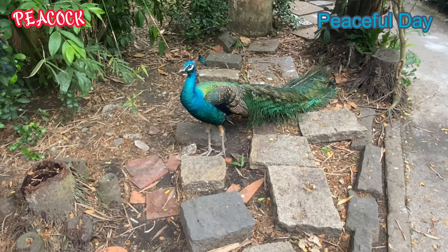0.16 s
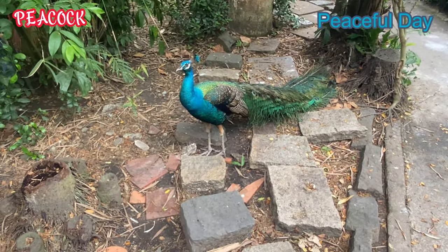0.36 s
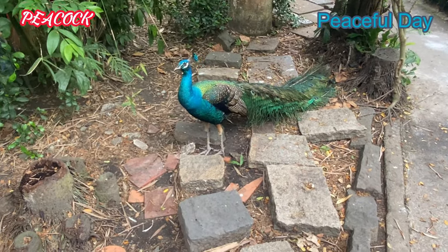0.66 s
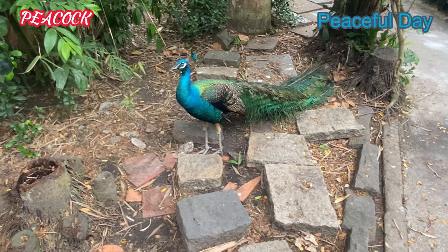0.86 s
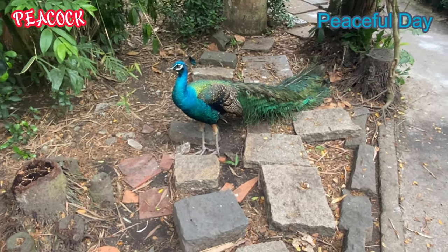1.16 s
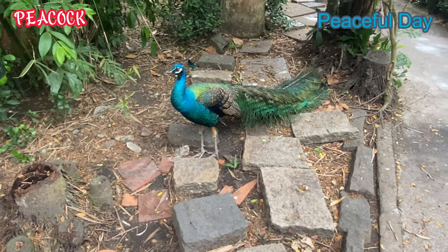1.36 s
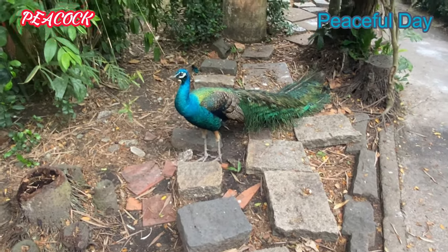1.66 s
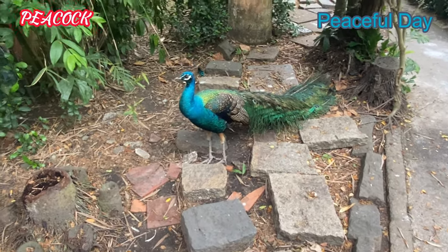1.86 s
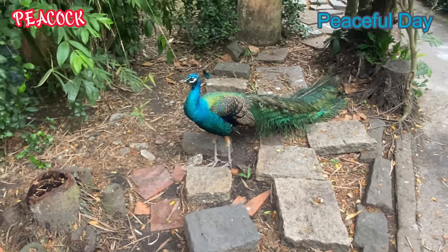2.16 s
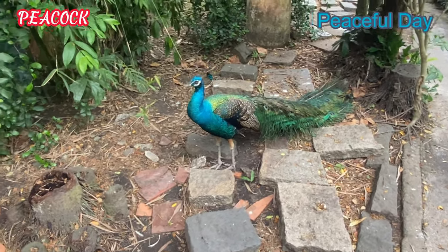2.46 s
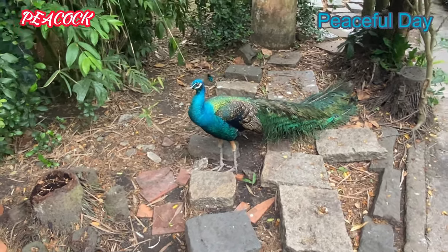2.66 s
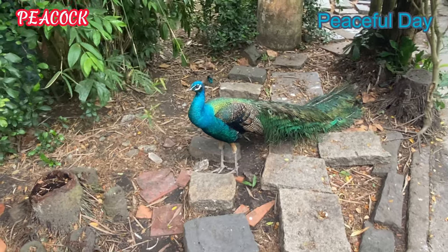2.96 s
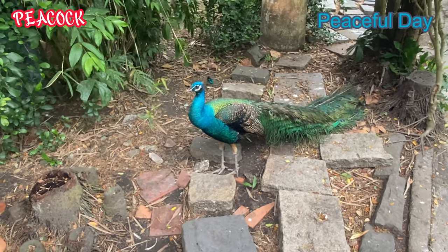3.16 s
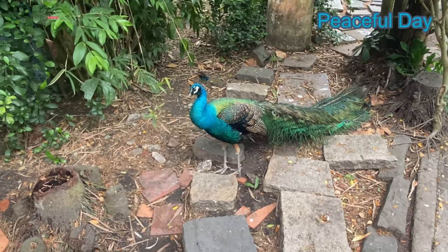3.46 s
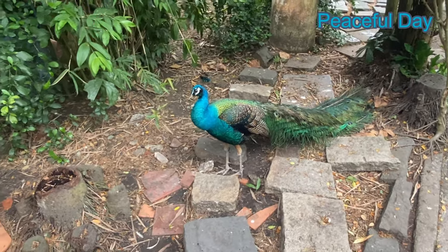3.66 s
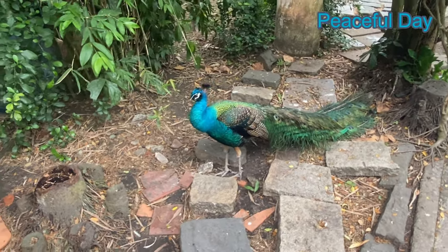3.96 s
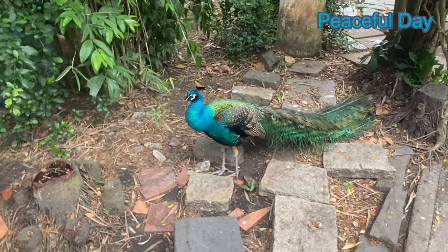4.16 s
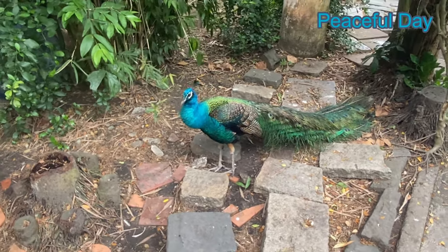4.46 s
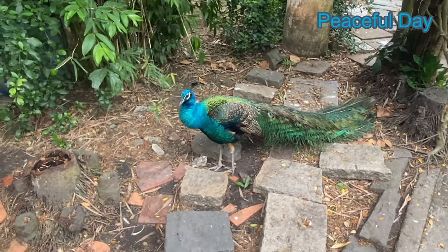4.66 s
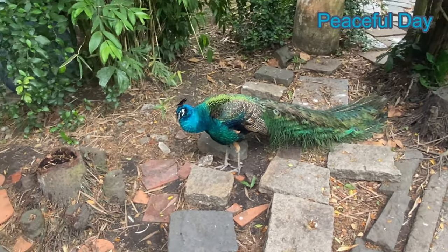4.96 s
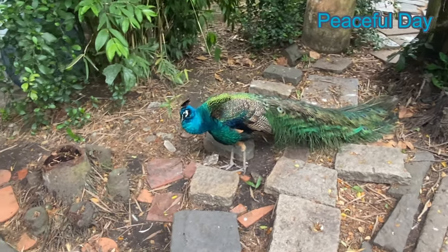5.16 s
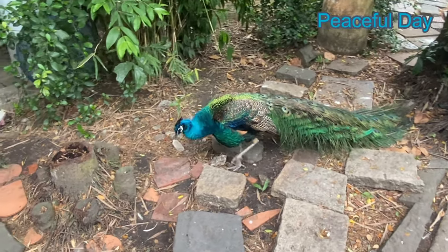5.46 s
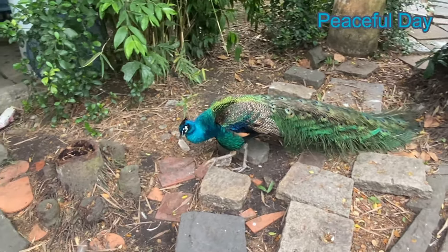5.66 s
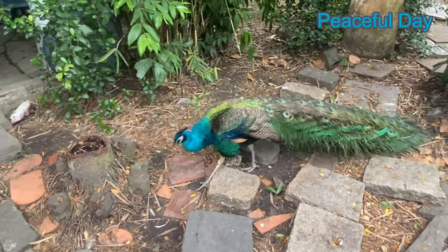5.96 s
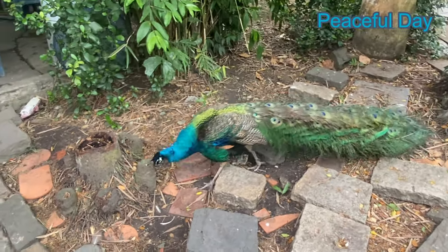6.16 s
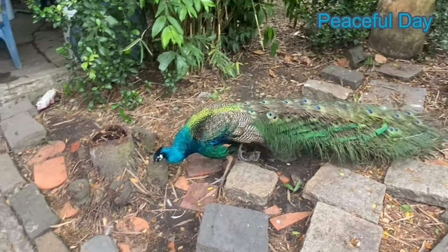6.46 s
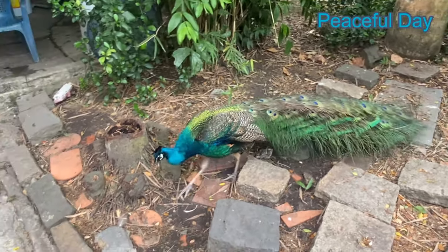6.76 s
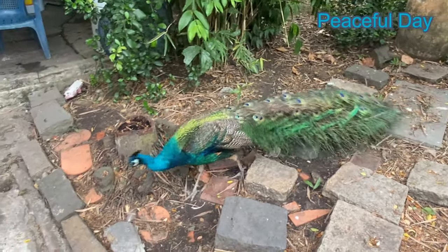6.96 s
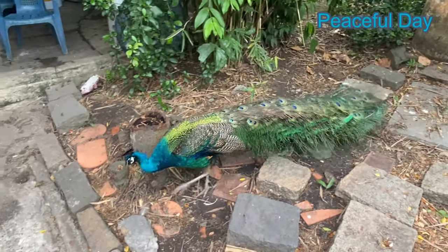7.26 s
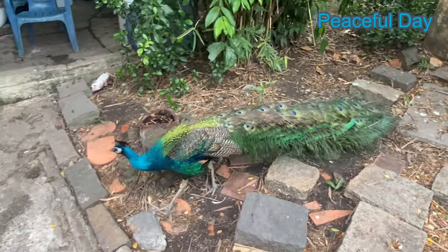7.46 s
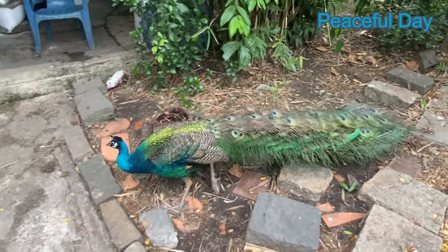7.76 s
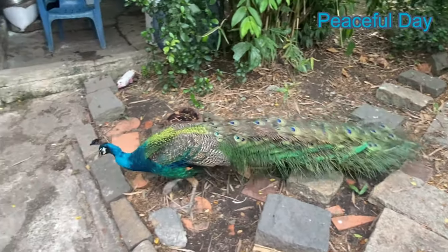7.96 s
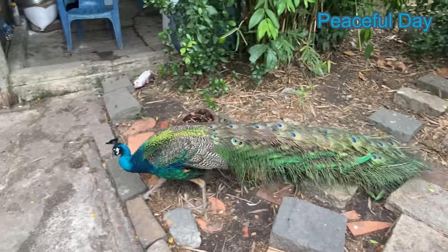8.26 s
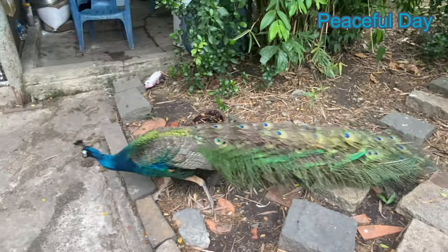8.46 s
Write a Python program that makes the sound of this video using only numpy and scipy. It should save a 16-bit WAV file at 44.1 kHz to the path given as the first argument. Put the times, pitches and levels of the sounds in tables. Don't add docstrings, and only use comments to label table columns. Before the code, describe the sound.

One peacock calls close by in a garden, with faint scattered reflections from walls and leaves and a very quiet, smooth far hiss. After half a second come five short, nasal, reedy cries of about 0.4 s, at roughly 0.5, 1.15, 1.8, 2.4 and 3.1 s. Each climbs quickly from about 555 to 670 Hz, holds, then sags and snaps shut, with strong ringing upper harmonics. The first is brightest; the last is longest and loudest. Small hollow throat gulps and airy puffs fall between. From 3.7 s the sound fades to silence by 3.96. At 4.2 s a longer cry rises softly, peaks near 4.5, then sinks and dulls, its flutter deepening into rapid pulses until a gulp near 5.1. The five short cries repeat from about 5.5 to 8.6 s. Bass is absent; the image is almost mono.

```python
import sys
import numpy as np
from scipy import signal
from scipy.fft import rfft, irfft
from scipy.io import wavfile
from scipy.ndimage import uniform_filter1d

SR = 44100
rng = np.random.default_rng(int(sys.argv[2]) if len(sys.argv) > 2 else 0)


def store_wav(level_fs):
    pcm = np.round(np.clip(np.atleast_2d(level_fs), -1, 1) * 32767)
    wavfile.write(sys.argv[1], SR, pcm.T.astype(np.int16))


def voltage_ratio(decibels):
    exponent = np.asarray(decibels, float) / 20
    return 10 ** exponent


N = 380141
ROUND = round(5.02 * SR)
SPAN = ROUND + SR // 4


def in_time(rows, size=SPAN):
    s, *columns = np.transpose(rows)
    return [np.interp(np.arange(size) / SR, s, c) for c in columns]


def at_hz(points, hz):
    table_hz, db = np.transpose(points)
    return np.interp(np.log(hz), np.log(table_hz), db)


def drift(rate_hz, shape):
    r = np.exp(-2 * np.pi * rate_hz / SR)
    settle = 4000
    white = rng.standard_normal((shape[0], shape[1] + settle))
    slow = signal.lfilter([1], [1, -2 * r, r * r], white)[:, settle:]
    return slow / slow.std()


def coloured(spectrum, shape):
    hz = np.arange(shape[-1] // 2 + 1) * SR / shape[-1] + 1
    noise = irfft(rfft(rng.standard_normal(shape)) * voltage_ratio(at_hz(spectrum, hz)), shape[-1])
    return noise / noise.std()


# frequency in Hz, level in dB per Hz.
FLOOR_COLOUR = [(260, -63), (450, -16.5), (553, -8), (937, -12), (1070, -5), (1350, -20), (1900, -20),
                (15000, -32)]


def far_hiss():
    mid, side = coloured(FLOOR_COLOUR, (2, ROUND))
    return voltage_ratio(-51.5 - 17.0) * (mid + voltage_ratio(-21.0) * side * [[1], [-1]])


def rumble():
    low = voltage_ratio(-88.5) * drift(207, (2, ROUND))
    return low[0] + voltage_ratio(-10) * low


def cry(rows, close, lone, odd, odd_spectrum, throat, bright, dull_db, jitter_hz, shimmer_db,
        air, air_db, size, flutter=None):
    closing = np.append(close, 0) * [1, -1, -1, -1, -1, -1, -1, 0]
    rows = list(rows) + [np.array(rows[-1]) + closing]
    a, b = round(rows[0][0] * SR), round(rows[-1][0] * SR)
    hz, first_db, lone_db, throat_db, bright_db, tilt_db, odd_db = [c[a:b] for c in in_time(rows)]
    hz = uniform_filter1d(hz, size=700)
    slack = np.maximum(672 - hz, 0) / 100
    k = np.arange(1, 26)[:, None]

    hz = hz + jitter_hz * (.35 + 4 * slack) * drift(60, (1, size))[0, :b - a]
    slow = drift(8, (len(k), size))[:, :b - a]
    rough = drift(110, (len(k), size))[:, :b - a]
    wander = slow + 1.3 * np.minimum(slack, .7) * rough
    shimmer_db = shimmer_db * np.minimum(k - 1, 7) * .6 * wander
    start, lag = rng.uniform(0, 2 * np.pi, (2, len(k), 1))
    beat = 1
    if flutter is not None:
        beat, swing_hz, angle = [c[a:b] for c in flutter]
        hz = hz + swing_hz
        shimmer_db = shimmer_db + 2.2 * (k > 2) * np.cos(angle + lag)

    band_edge_hz = 4350
    partial_hz = k * hz
    upper = np.clip((partial_hz - band_edge_hz) / 200 + .5, 0, 1)
    octaves_up = np.log2(np.maximum(partial_hz / band_edge_hz, 1))
    mid_db = at_hz(throat, partial_hz) + tilt_db * np.log2(partial_hz / 3200)
    mid = (k > 3) * np.where(k > 6, .3, 1) * (1 - upper) * voltage_ratio(mid_db)
    top_db = at_hz(bright, partial_hz) - dull_db * slack * octaves_up
    top = upper * voltage_ratio(top_db) * (partial_hz < 16000)
    level = voltage_ratio(throat_db) * mid / np.linalg.norm(mid, axis=0)
    level = level + voltage_ratio(bright_db) * top / np.linalg.norm(top, axis=0)

    level[0] = voltage_ratio(first_db)
    level[lone - 1] = voltage_ratio(lone_db)
    level[odd - 1] = voltage_ratio(first_db + odd_db + at_hz(odd_spectrum, odd * hz))
    level[1:] *= beat
    level[0] *= .4 + .6 * beat

    turns = np.cumsum(hz) / SR
    waves = np.sin(2 * np.pi * k * turns + start)
    voice = np.sqrt(2) * np.sum(level * voltage_ratio(shimmer_db) * waves, axis=0)
    hiss_db = bright_db + air_db + 32 * np.minimum(slack, .8)
    hiss = coloured(air, (size,))[:b - a] * voltage_ratio(hiss_db)
    ramp = np.arange(b - a)
    edge = np.clip(np.minimum(ramp, ramp[::-1]) / (.003 * SR), 0, 1) ** 1.5
    out = np.zeros(SPAN)
    out[a:b] = (voice + hiss * beat) * edge
    return out


# start in seconds, length in seconds, top pitch in Hz,
# creep up to the top in Hz, level of the first partial in dB.
SHORT_CRIES = [
    (0.509, 0.41, 670.4, 33, -33),
    (1.154, 0.432, 671, 8.7, -31.5),
    (1.796, .401, 665, 0.37, -31),
    (2.409, 0.4045, 664.5, 9, -30),
    (3.09, .469, 670, 22.4, -28.5),
]
# pitch in Hz, first partial in dB, then against it third partial,
# throat band and bright band in dB.
SHORT_BY_PITCH = [(522, -12, 1, 5.3, -10.5), (575, -6, 5.5, 2.4, -17.5), (594, -4, 7, 5.2, -14),
                  (631, -2, 4, 1.7, -16), (647.6, 0.4, 7, 1.4, -14.5), (673, 0.5, 10.5, 3.7, -11.5)]


def short_controls(start_s, length_s, top_hz, creep_hz, level_db):
    u = np.linspace(0, 1, 80)
    t = u * length_s
    first_start_s = SHORT_CRIES[0][0]
    beak = max(1 - (start_s - first_start_s) / 2.9, 0)
    cold = start_s == first_start_s
    start_hz, climb_s, knee_s, top_share = 555.1, .064 + .055 * cold, .017, 0.52
    rising = u < top_share
    sag = np.maximum(u - top_share, 0) / (1 - top_share)

    climb = np.logaddexp(0, (climb_s - t) / knee_s)
    hz = top_hz - (top_hz - creep_hz - start_hz) * climb / climb[0]
    hz = hz - creep_hz * np.maximum(1 - u / top_share, 0) ** 1.03
    hz = hz - (105 + 21.6 * cold) * sag ** 1.95
    hz = hz - 26 * np.exp((t - length_s) / 0.0037)

    at, *columns = np.transpose(SHORT_BY_PITCH)
    first, third, throat, bright = [np.interp(hz, at, c) for c in columns]
    attack = np.maximum(1 - t / .009, 0)
    taut = np.clip((hz - 600) / 60, 0, 1)
    first = level_db + first - 23.5 * attack + 3.5 * beak * (u - .5)
    second = -4 * np.exp(-((u - 0.34) / 0.09) ** 2)
    third = third - 5 * beak ** 3.0 + 1 * np.sqrt(beak) * (u - .5)
    third = third + rising * -5 * np.exp(-((hz - 624.7) / 26) ** 2)
    throat = throat + 9.5 * beak ** 7.2 * (0.22 + 0.62 * taut)
    throat = throat + 4.5 * rising * (1 - taut)
    bright = bright + 6 * beak * taut - 28.5 * attack
    tilt = 1 + 21.5 * beak * (.4 + 0.21 * taut) - 10 * u
    return np.transpose([start_s + t, hz, first, first + third, first + throat, first + bright, tilt, second])


# length in seconds, pitch fall in Hz, then falls in dB of
# first partial, third partial, throat band and bright band, and of the tilt in dB per octave.
SHORT_CLOSE = (0.011, 46, 18, 23, 7.9, 21, 1.5)
# frequency in Hz, level in dB.
SHORT_SECOND = [(1000, 3.5), (1180, 4), (1260, -1.2), (1335, -5)]
# frequency in Hz, level in dB.
SHORT_THROAT = [(2000, -4), (2250, 8.5), (2450, -8.5), (2650, 4.5), (2850, 0), (3050, 0.5), (3230, -5),
                (3340, 2.5), (3700, -14.5), (3980, 0.5), (4250, -18)]
# frequency in Hz, level in dB.
SHORT_BRIGHT = [(4250, 18), (4500, -3), (4750, -4), (5300, -4.5), (5650, -7.5), (5980, 0.4), (6650, -11.5),
                (7300, -13), (8000, -19), (8650, -10), (9300, -16), (10600, -13), (12500, -15),
                (15500, -27.5)]
# frequency in Hz, level in dB.
SHORT_AIR = [(1500, -45.5), (3200, -27), (4600, 3.5), (6500, 0.5), (9000, -28.5), (11500, -7.5),
             (15000, -23.5), (17000, -41)]


def short_cries():
    return sum(cry(short_controls(*row), SHORT_CLOSE, 3, 2, SHORT_SECOND, SHORT_THROAT, SHORT_BRIGHT,
                   dull_db=13.5, jitter_hz=0.74, shimmer_db=0.88, air=SHORT_AIR, air_db=-31, size=24000)
               for row in SHORT_CRIES)


# frequency in Hz, level in dB.
TAIL = [(500, -40.5), (1000, -39), (2000, -27), (3000, -31), (4500, -21), (6500, -28), (9000, -35.5),
        (15000, -37.5)]
# frequency in Hz, time to fall 60 dB in seconds.
TAIL_T60 = [(500, 1.3), (1300, 1.3), (2500, 1.1), (5000, 1.05), (12000, .7)]
# frequency in Hz, level in dB.
EARLY = [(500, -42), (1300, -29), (2500, -22.5), (4000, -32), (6500, -10), (12000, -28)]
# delay in seconds, level in dB.
ECHOES = [(0.019, -17), (0.034, -25), (0.057, -35.5)]


def garden(x):
    t, early, late = np.arange(SR * 3 // 2) / SR, 0, 0
    early_t60 = 0.84
    white = rng.standard_normal((2, 2, len(t)))
    edges = 400 * 2 ** np.arange(0, 5.4, 1 / 3)
    for i, (low, high) in enumerate(zip(edges, edges[1:])):
        hz = np.sqrt(low * high)
        t60 = at_hz(TAIL_T60, hz)
        band_pass = signal.butter(2, [low, high], "band", fs=SR, output="sos")
        band = signal.sosfilt(band_pass, white[i % 2])
        late = late + band[0] * voltage_ratio(at_hz(TAIL, hz) - 60 * t / t60) / np.sqrt(t60)
        early = early + band[1] * voltage_ratio(at_hz(EARLY, hz))
    unit = np.sqrt(6 * np.log(10) / SR)
    late = late * unit * np.clip(t / 0.049, 0, 1)
    early = early * unit / np.sqrt(early_t60) * voltage_ratio(-60 * t / early_t60) * np.clip(t / .008, 0, 1)
    for delay_s, echo_db in ECHOES:
        early[round(delay_s * SR)] += voltage_ratio(echo_db)
    stirred = x * (.75 + .6 * drift(22, (1, ROUND))[0])
    return irfft(rfft(x) * rfft(early, ROUND) + rfft(stirred) * rfft(late, ROUND), ROUND)


# time in seconds, peak in dB, ring in Hz, puff in dB against the ring,
# puff decay in seconds.
GULPS = [
    (1.114, -35, 754, -18, 0.17),
    (1.616, -40, 694, -7, 0.036),
    (2.225, -62.5, 650, -12, 0.11),
    (3.72, -47, 674, -31, 0.1),
    (5.101, -31.5, 613.5, -21, 0.082),
    (5.184, -57, 590, -23, 0.11),
]


def gulps():
    out, t = np.zeros(SPAN), np.arange(11000) / SR
    puff_colour = [(500, -6.5), (1500, -11.5), (3000, -2.5), (5000, -13), (9000, -32.5), (16000, -43.5)]
    puffs = coloured(puff_colour, (len(GULPS), len(t)))
    for (s, peak_db, hz, puff_db, puff_s), puff in zip(GULPS, puffs):
        ring = np.sin(2 * np.pi * hz * t * (1.1 - 9 * t)) * t / 0.0073 * np.exp(1 - t / 0.0027)
        breath = voltage_ratio(puff_db) * puff * np.exp(-t / puff_s) * np.minimum(t / 0.0065, 1)
        at = round((s - .002) * SR)
        out[at:at + len(t)] += voltage_ratio(peak_db) * (ring + breath)[:SPAN - at]
    return out


def flutter():
    t = np.arange(SPAN) / SR
    peak_s, growth_s, snap_s = 5.0605, .105, 0.0097
    per_s = np.clip(58 - 17.2 * (t - 4.3), 46.2, 58)
    breaking = np.exp((t - peak_s) / growth_s)
    snap = 0.29 * np.minimum(breaking, 2) ** (growth_s / snap_s)
    depth = .07 + 1.1 * breaking + snap
    swing_hz = 6 + 4.9 * np.minimum(breaking, 1)
    turns = np.cumsum(per_s) / SR
    angle = 2 * np.pi * (turns - turns[round(peak_s * SR)])
    wave = np.cos(angle) + .25 * np.cos(2 * angle)
    beat = (1 + depth * wave) / np.sqrt(1 + depth ** 2 / 2)
    return beat, swing_hz * np.sin(angle + 0.13), angle


# time in seconds, pitch in Hz, effort in dB.
LONG_CRY = [
    (4.205, 573, -74),
    (4.245, 555, -38),
    (4.269, 590, -22.5),
    (4.4, 661, -6),
    (4.477, 674.4, -3),
    (4.571, 667.2, 0.5),
    (4.777, 662.7, -6),
    (4.913, 646.3, -19),
    (5.06, 616.2, -35),
]
# level at full effort in dB (tilt in dB per octave), share of the effort followed.
LONG_FOLLOWS = [(-36, .16), (-21, 0.29), (-31, 0.61), (-29, 0.95), (-8, -0.85)]
# pitch in Hz, second partial in dB, throat band in dB.
LONG_CLIMB = [(560, -15, -4.5), (590, 1, 14), (607, 1.5, 6), (640, -10, 0), (644, -3, -4), (668, 3, -2)]


def long_controls():
    s, hz, effort = np.transpose(LONG_CRY)
    t = np.linspace(s[0], s[-1], 200)
    rising = t < s[np.argmax(hz)]
    hz, effort = np.interp(t, s, hz), np.interp(t, s, effort)
    attack = -24.5 * np.maximum(1 - (t - s[0]) / 0.017, 0)
    first, second, throat, bright, tilt = [full + share * effort for full, share in LONG_FOLLOWS]
    at, second_db, throat_db = np.transpose(LONG_CLIMB)
    second = second + rising * np.interp(hz, at, second_db)
    throat = throat + rising * np.interp(hz, at, throat_db)
    return np.transpose([t, hz, first + attack, second + attack, throat + attack, bright, tilt, 0 * t])


# length in seconds, pitch fall in Hz, then falls in dB of
# first partial, second partial, throat band and bright band, and of the tilt in dB per octave.
LONG_CLOSE = (0.03, 9.6, 5.9, 3.8, 7.6, 5, 1.5)
# frequency in Hz, level in dB.
LONG_THIRD = [(1650, -21), (1850, -12.5), (2020, -9)]
# frequency in Hz, level in dB.
LONG_THROAT = [(2000, -14.5), (2500, -4.5), (2690, -2), (3100, -13), (3360, 2.5), (3650, 9), (3850, -10),
               (4040, 6), (4250, -14)]
# frequency in Hz, level in dB.
LONG_BRIGHT = [(4250, -4.5), (4700, 0.8), (5350, -10.5), (6050, -2.5), (6720, -0.3), (7350, -13),
               (8050, -10.5), (8700, -3), (9400, -5), (10100, -6.5), (11000, -11), (12500, -17.5),
               (15500, -23.5)]
# frequency in Hz, level in dB.
LONG_AIR = [(1500, -55.5), (3200, -5.5), (5000, -7.5), (6300, -2), (7400, -9.5), (9500, -4.5), (13000, -12),
            (17000, -40)]


def long_cry():
    return cry(long_controls(), LONG_CLOSE, 2, 3, LONG_THIRD, LONG_THROAT, LONG_BRIGHT, dull_db=20,
               jitter_hz=2.2, shimmer_db=0.45, air=LONG_AIR, air_db=-22, size=42000, flutter=flutter())


def sides_apart(x):
    hz = np.arange(ROUND // 2 + 1) * SR / ROUND + 1
    phase_db = at_hz([(600, -34), (1300, -38.5), (5000, -47), (7000, -31), (15000, -27)], hz)
    lean = voltage_ratio(-40) + 1j * voltage_ratio(phase_db)
    return x - irfft(rfft(x) * lean, ROUND) * [[1], [-1]]


# time in seconds, level in dB.
FADE = [
    (0, -1),
    (3.7, -0.5),
    (3.85, -10.5),
    (3.92, -22),
    (3.96, -70),
    (4.19, -66),
    (4.215, -1),
]


def scene():
    bird = short_cries() + gulps() + long_cry()
    once = bird[:ROUND] + np.pad(bird[ROUND:], (0, 2 * ROUND - SPAN))
    heard = sides_apart(once) + garden(once) + far_hiss()
    bass_cut = signal.butter(8, 498, "high", fs=SR, output="sos")
    heard = signal.sosfilt(bass_cut, np.tile(heard, 2))[:, ROUND:]
    fade = voltage_ratio(in_time(FADE, size=ROUND)[0])
    return np.tile((heard + rumble()) * fade, 2)[:, :N]


def low_pass(x):
    return signal.sosfilt(signal.butter(12, 15720, fs=SR, output="sos"), x)


def record(dry):
    return low_pass(dry)


dry = scene()
out = record(dry)
store_wav(out)
```